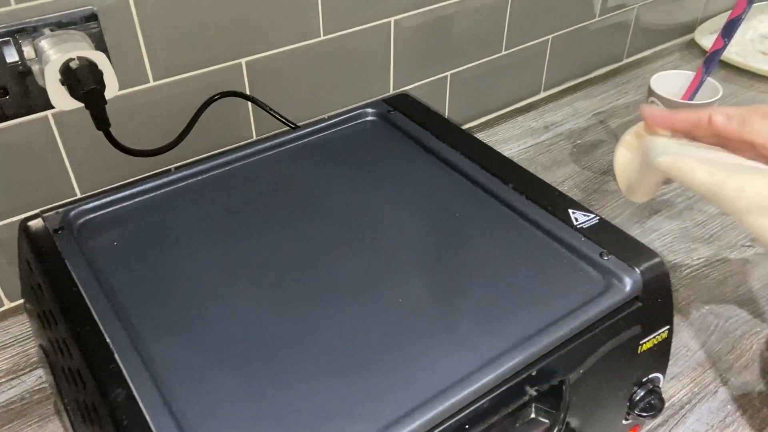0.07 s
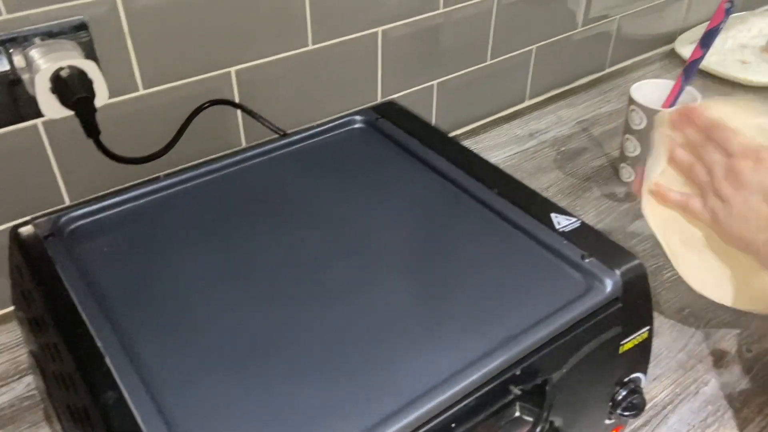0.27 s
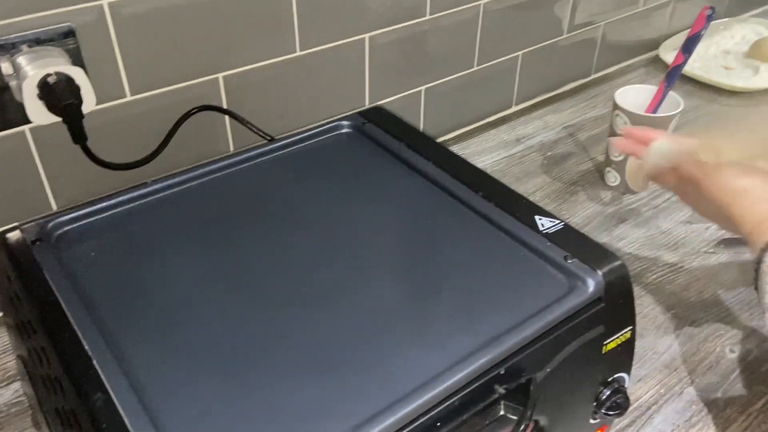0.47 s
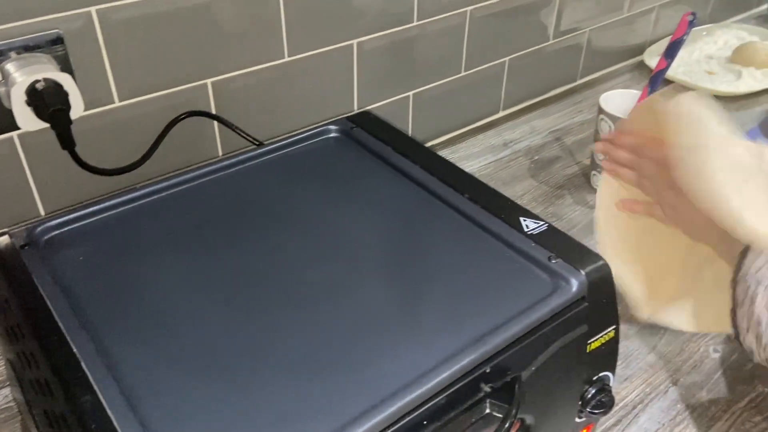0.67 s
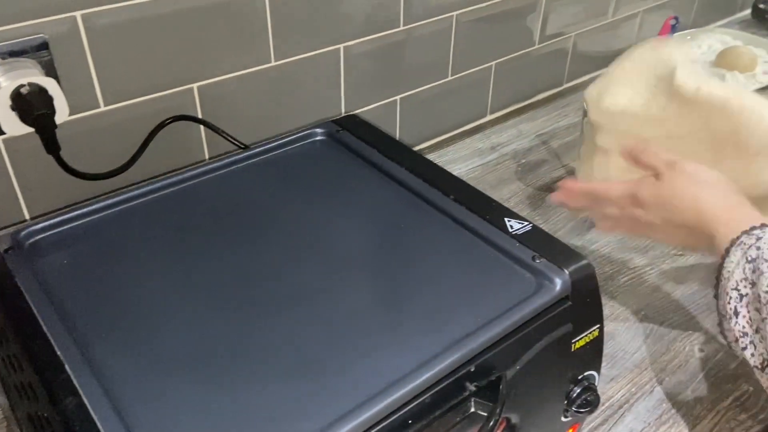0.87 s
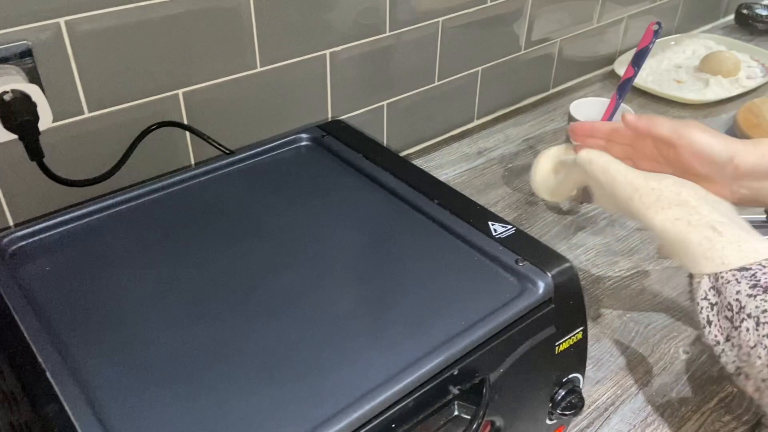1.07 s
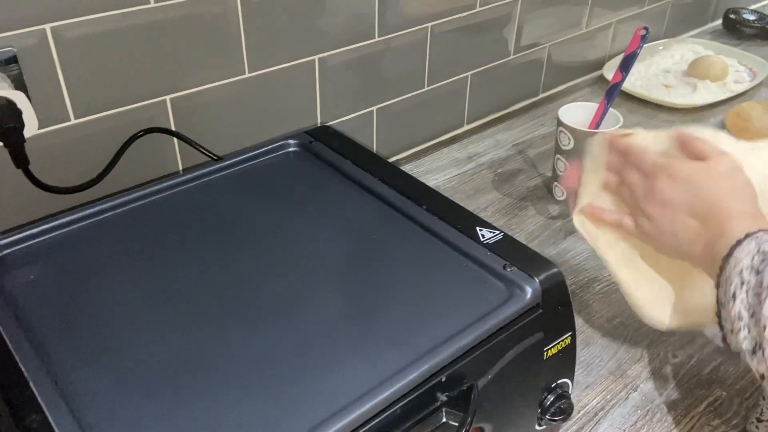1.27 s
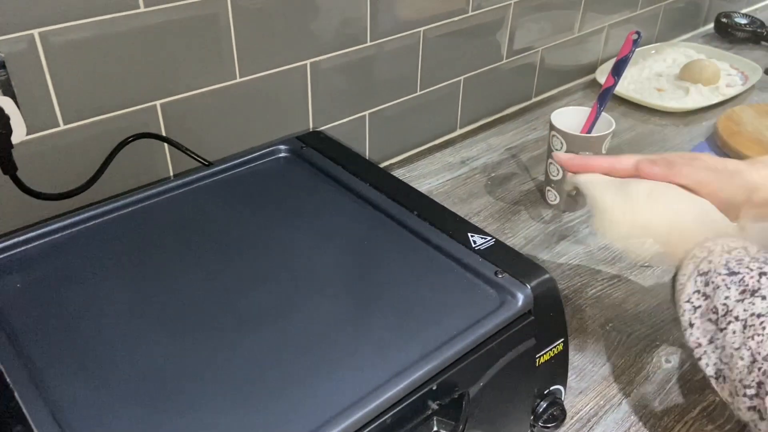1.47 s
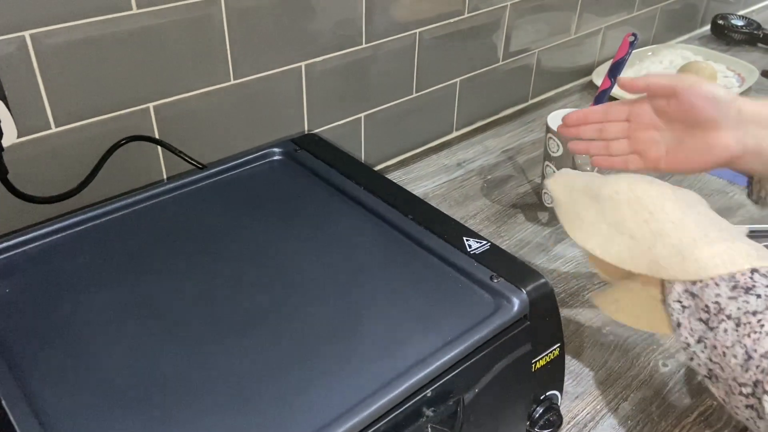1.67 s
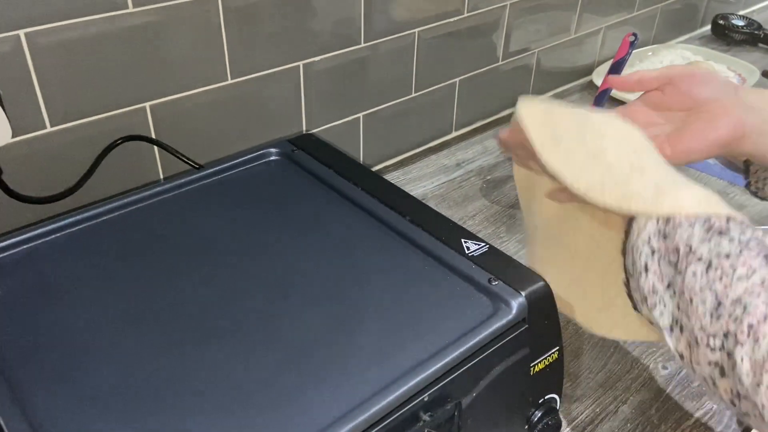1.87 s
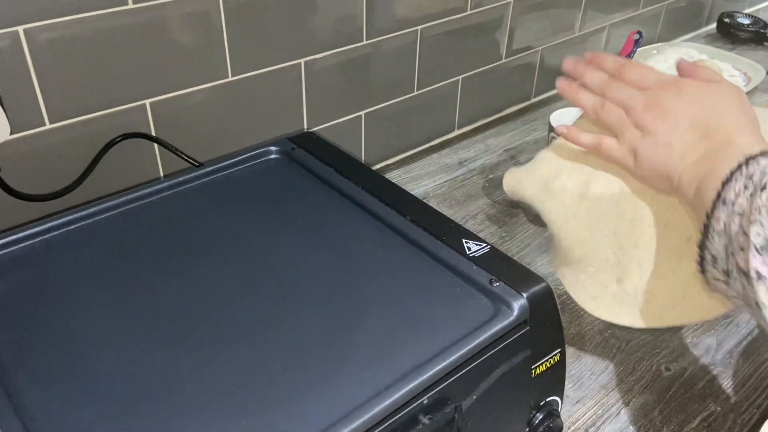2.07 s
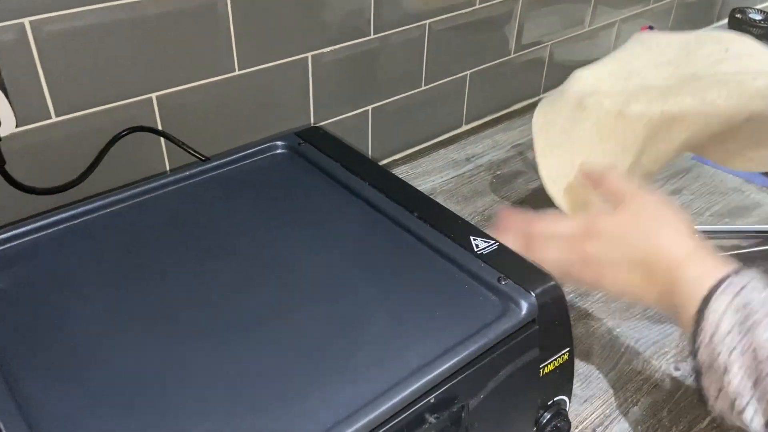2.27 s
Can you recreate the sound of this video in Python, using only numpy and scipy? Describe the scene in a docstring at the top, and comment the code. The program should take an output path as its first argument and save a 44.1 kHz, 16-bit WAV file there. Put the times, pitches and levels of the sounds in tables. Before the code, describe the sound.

Close phone pickup of dough slapped between palms: fleshy cracks with hollow air pops and soft low thuds, light brushing between them, a pause, then a final quieter slap, with short kitchen reverberation and faint appliance hum.

```python
"""A round of flatbread dough is tossed from hand to hand in a tiled kitchen, over a faint appliance hum.
It opens in the middle of a slap; about four slaps a second follow, then a gap of light brushes, then a last slap.
Each slap is a crack of skin on dough (shaped noise), a pop of trapped air (narrow noise), and the knocks
of the palm's hollow and the dough's weight (fading sine waves). Fingers and dough edge brush in between.
Cracks and brushes get a quick tile echo, thuds set off low room resonances, all leave a tail of fading noise."""
import sys
import numpy as np
from scipy import signal
from scipy.fft import rfft, irfft
from scipy.io import wavfile
from scipy.ndimage import uniform_filter1d

SR = 44100
rng = np.random.default_rng(int(sys.argv[2]) if len(sys.argv) > 2 else 0)


def wav_record(signal):
    """Record a signal, one row per channel, as 16-bit PCM in the file named by sys.argv[1]."""
    frames = np.transpose(np.atleast_2d(signal))
    bounded = np.clip(frames, -1, 1)
    # unit amplitude maps onto the largest positive 16-bit level
    quanta = np.round(bounded * 32767).astype(np.int16)
    wavfile.write(sys.argv[1], SR, quanta)


N = 101429
LEAD_S = 0.1  # extra time before the start, so that the first slap can begin early


def undb(db):
    """Turn decibels into a plain multiplier."""
    return 10 ** (np.asarray(db) / 20)


def unit(x):
    """Scale to rms 1."""
    return x / np.sqrt(np.mean(x ** 2))


def curve(points, hz):
    """Read a table between its rows, on a log-frequency axis."""
    p = np.array(points, float)
    return np.interp(np.log(np.maximum(hz, 1)), np.log(p[:, 0]), p[:, 1])


def freqs(size):
    """Frequencies in Hz of the spectrum of a sound with this many samples."""
    return np.arange(size // 2 + 1) * SR / size


def noise(gain):
    """Noise of rms 1 with the given gain at each frequency: every frequency gets a random phase."""
    phase = 2 * np.pi * rng.random(len(gain))
    return unit(irfft(gain * np.exp(1j * phase)))


def resonance(f, hz, width_hz):
    """Gain of a resonance, down to half at width_hz from its centre."""
    return 1 / (1 + ((f - hz) / width_hz) ** 2)


def add(out, x, start_s):
    """Mix a sound in at its time."""
    i = max(int((start_s + LEAD_S) * SR), 0)
    n = min(x.shape[-1], out.shape[-1] - i)
    out[..., i:i + n] += x[..., :n]


def stereo(mid, side):
    """Left and right from what they share (mid) and how they differ (side)."""
    return np.array([mid + side, mid - side])


def burst(gain, rise_s, hold_s, release_s):
    """A short rush of evenly coloured noise: rise, hold, release."""
    x = noise(gain)
    t = np.arange(len(x)) / SR
    rise = np.minimum(t / rise_s, 1)
    release = np.exp(-np.maximum(t - rise_s - hold_s, 0) / release_s)
    env = rise * release
    # keep the phases but restore the wanted colour: this fills the chance holes in the spectrum
    phase = np.angle(rfft(x * env))
    even = irfft(gain * np.exp(1j * phase))
    return unit(even * np.sqrt(env)) * np.sqrt(np.mean(env ** 2))


def knock(t, hz, rise_s, decay_s):
    """A softly struck, heavily damped mode: a sine wave that swells briefly and dies."""
    env = (1 - np.exp(-t / rise_s)) * np.exp(-t / decay_s)
    return np.sqrt(2) * env / env.max() * np.sin(2 * np.pi * hz * t)


# Colour of skin meeting dough. Each row: frequency in Hz, relative level per Hz in dB.
SKIN_COLOUR = [(40, -26.5), (120, -9.5), (220, -0.5), (290, -10), (450, 3), (560, -5.5), (720, -3.5),
               (1000, -8.5), (1400, 0.5), (2000, -1), (2900, -5.5), (4100, -5.5), (5200, -14.5),
               (7500, -16.5), (9500, -23.5), (12500, -15.5), (15500, -26.5)]
TILT_LOW_HZ, TILT_TOP_HZ = 200, 7000  # the tilt stops growing outside this range


def skin(f, tilt_db):
    """Spectrum of the contact, brighter for a flatter blow; tilt in dB per octave around 1500 Hz."""
    octaves = np.log2(np.clip(f, TILT_LOW_HZ, TILT_TOP_HZ) / 1500)
    return undb(curve(SKIN_COLOUR, f) + tilt_db * octaves)


CONTACT_S, RELEASE_S = 0.0033, 0.0048  # hold and release of the crack


def crack(f, tilt_db, rise_s):
    """Wet skin hits dough: a burst of broad noise."""
    return burst(skin(f, tilt_db), rise_s, CONTACT_S, RELEASE_S)


SQUEEZE_HZ, SQUEEZE_WIDTH_HZ, SQUEEZE_RELEASE_S = 930, 260, 0.006


def squeezed_air(f, rise_s):
    """Air pressed out between hand and dough: a burst of noise around one pitch."""
    return burst(resonance(f, SQUEEZE_HZ, SQUEEZE_WIDTH_HZ), rise_s, CONTACT_S, SQUEEZE_RELEASE_S)


POCKET_HOLD_S, POCKET_RELEASE_S = 0.0026, 0.0025


def pop(f, hz, width_hz, rise_s):
    """Air trapped under the palm resonates: a burst of noise in a band around the pocket's pitch."""
    return burst(resonance(f, hz, width_hz), rise_s, POCKET_HOLD_S, POCKET_RELEASE_S)


# Hollow of the palm. Each row: frequency in Hz before a small random change,
# level in dB added to the slap's palm level, decay in seconds.
PALM_MODES = [(363, -1, 0.0063), (436, -10, 0.004)]
PALM_SCATTER, PALM_RISE_S = 0.02, 0.0025  # scatter: typical random change of pitch, as a share


def palm(t):
    """The palm's hollow rings for a moment, in a few damped modes."""
    # the pitch varies a little with each direction the ring is sent, which blurs it in the room
    pitch_change = np.exp(PALM_SCATTER * rng.standard_normal())
    return sum(undb(db) * knock(t, hz * pitch_change, PALM_RISE_S, decay_s) for hz, db, decay_s in PALM_MODES)


THUD_HZ, THUD_RISE_S, THUD_DECAY_S = 160, 0.0018, 0.0038


def thud(t):
    """The dough's weight lands: a soft low knock."""
    return knock(t, THUD_HZ, THUD_RISE_S, THUD_DECAY_S)


SAG_HZ, SAG_RISE_S, SAG_DECAY_S = 102, 0.0022, 0.011


def sag(t):
    """The dough sags after landing: a lower, longer knock."""
    return knock(t, SAG_HZ, SAG_RISE_S, SAG_DECAY_S)


RUSTLE_GRAIN_S, RUSTLE_SPREAD_DB = 0.0015, 5


def rustle(x):
    """Dough sticks and peels in tiny patches, so a touch comes in uneven grains."""
    grain = int(RUSTLE_GRAIN_S * SR)
    levels = undb(RUSTLE_SPREAD_DB * rng.standard_normal(len(x) // grain + 1))
    patches = uniform_filter1d(np.repeat(levels, grain), grain // 2)  # soften the steps
    return unit(x * patches[:len(x)]) * np.std(x)


TOUCH_RISE_SHARE, TOUCH_HOLD_SHARE, TOUCH_RELEASE_SHARE = 0.35, 0.69, 0.18  # of the touch's length


def touch(f, length_s, tilt_db):
    """Fingers or dough edge brush lightly: a grainy burst in the colour of skin on dough."""
    brush = burst(skin(f, tilt_db), length_s * TOUCH_RISE_SHARE,
                  length_s * TOUCH_HOLD_SHARE, length_s * TOUCH_RELEASE_SHARE)
    return rustle(brush)


# The slaps. Each row: start in seconds, crack level in dB, crack tilt in dB per octave,
# air pocket pitch in Hz, pocket width in Hz, pop level in dB, pocket overtone level in dB,
# squeezed air level in dB, palm level in dB, thud level in dB, sag level in dB, rise in seconds.
SLAPS = [(-.045, -17.5, 0.5, 1340, 300, -21, -41, -47, -22.5, -29.5, -38.5, 0.0015),
         (0.223, -23, -0.4, 1264, 190, -18.5, -26, -41, -24.5, -37.5, -34, .00064),
         (0.4278, -11.5, 0, 1650, 450, -10, -19.5, -27.5, -15, -22.5, -32.5, 0.0026),
         (0.689, -27, 0.1, 1950, 500, -28, -38.5, -51.5, -36.5, -36, -39.5, 0.00035),
         (.9010, -20, 0.84, 1303, 171, -14, -24, -22.5, -26.5, -32.5, -37, 0.0042),
         (1.1877, -28.5, -0.2, 1367, 380, -22, -55, -32.5, -37.5, -35, -36.5, 0.002505),
         (1.42, -30.5, -0.7, 1556, 380, -22.5, -43, -32, -28, -30, -36.5, 0.0058),
         (2.0050, -25.5, -0.5, 1540, 200, -31, -30.5, -52, -26, -36, -33.5, 0.0041)]
# Light touches of fingers and dough edge. Each row: start in seconds, length in seconds,
# level in dB, tilt in dB per octave.
TOUCHES = [(0.197, 0.017, -30, 0), (0.296, 0.021, -48, 6.5), (0.417, 0.0068, -37, -1.5),
           (0.658, 0.012, -47, -0.5), (0.672, 0.018, -34.5, -1.9), (0.759, 0.023, -49.5, 4),
           (0.8918, 0.021, -28.5, -3.5), (1.156, 0.011, -38.5, -1.5), (1.163, 0.039, -41, -1),
           (1.279, 0.023, -49.5, 7), (1.412, 0.015, -40.5, 2), (1.47, 0.014, -43, -1.5),
           (1.561, 0.011, -47, -13), (1.631, .1, -70, 4), (1.964, 0.0039, -55, -5),
           (1.9927, 0.011, -41, -4)]
OVERTONE_RATIO = 1.87  # pitch of the pocket's overtone over its main pitch
SAG_DELAY_S = 0.016


def hands(size=8192):
    """Skin contact, air-pocket pops, palm hollow and low thuds as they radiate in one direction."""
    f, t = freqs(size), np.arange(size) / SR
    contact, pops, palms, thuds = np.zeros((4, N + int(LEAD_S * SR)))
    for (start_s, crack_db, tilt_db, pocket_hz, width_hz, pop_db, overtone_db,
         squeeze_db, palm_db, thud_db, sag_db, rise_s) in SLAPS:
        landed_s = start_s + rise_s
        add(contact, undb(crack_db) * crack(f, tilt_db, rise_s), start_s)
        add(contact, undb(squeeze_db) * squeezed_air(f, rise_s), landed_s)
        add(pops, undb(pop_db) * pop(f, pocket_hz, width_hz, rise_s), start_s)
        add(pops, undb(overtone_db) * pop(f, pocket_hz * OVERTONE_RATIO, width_hz, rise_s), start_s)
        add(palms, undb(palm_db) * palm(t), landed_s)
        add(thuds, undb(thud_db) * thud(t), landed_s)
        add(thuds, undb(sag_db) * sag(t), start_s + SAG_DELAY_S)
    for start_s, length_s, db, tilt_db in TOUCHES:
        add(contact, undb(db) * touch(f, length_s, tilt_db), start_s)
    return contact, pops, palms, thuds


WALL_DELAY_S, WALL_DB = 0.0032, -5.5


def wall(x):
    """The tiles just behind the hands return a quick echo that ripples the crack's colour."""
    echo = np.pad(x, (int(WALL_DELAY_S * SR), 0))[:len(x)]
    return (x + undb(WALL_DB) * echo) / np.hypot(1, undb(WALL_DB))


# Phase by which the left ear leads. Each row: frequency in Hz, lead in radians.
EAR_PHASE = [(100, 0), (300, 0.6), (440, 0.54), (600, 1.7), (1050, 1.2), (1400, 1.65), (2300, 1.41),
             (3000, 0.97), (6000, 1.1), (7500, 0.5), (9000, -13.5), (11000, -3), (13500, -16), (15500, -11)]
LEFT_DB = 0.54  # how much louder the left ear is than the right


def counter(x, size=131072):
    """The direct sound, scattered by worktop and tiles, reaches the two ears a little out of step."""
    lead = curve(EAR_PHASE, freqs(size))
    ears = np.array([[1], [-1]]) / 2  # each ear takes half of the difference
    shifted = irfft(rfft(x, size) * np.exp(1j * ears * lead))
    return shifted[:, :len(x)] * undb(ears * LEFT_DB)


# Low room resonances set off by the thuds. Each row: frequency in Hz,
# time to fade by 60 dB in seconds, level in dB.
ROOM_MODES = [(66.4, 0.27, -16), (114, 0.96, -3), (250, .3, -9)]


def boom(thuds, size=32768):
    """The room's low resonances ring on after each thud."""
    t = np.arange(size) / SR
    ring = 0
    for hz, t60, db in ROOM_MODES:
        fade = np.exp(-np.log(1000) * t / t60)
        ring = ring + undb(db) * unit(np.sin(2 * np.pi * hz * t) * fade)
    return signal.fftconvolve(thuds, ring * 2 / size)[:len(thuds)]


POP_ROOM_DB = -3.5  # the pocket faces the listener, so less of it reaches the room
PALM_ROOM_DB, THUD_ROOM_DB = -4, -3.5


def outward(contact, pops, palms, thuds):
    """The share of each sound that spreads into the room."""
    return contact + undb(POP_ROOM_DB) * pops + undb(PALM_ROOM_DB) * palms + undb(THUD_ROOM_DB) * thuds


# Colour of the kitchen's tail. Each row: frequency in Hz, level in dB.
ROOM_COLOUR = [(50, -13.5), (110, 6.5), (170, -3.5), (260, -1.5), (350, -7), (450, -0.5), (600, -2),
               (850, -5), (1400, -9.5), (3500, -8), (7000, -8.5), (15000, -13.5)]
# How long the tail lasts. Each row: frequency in Hz, time to fade by 60 dB in seconds.
ROOM_T60 = [(60, 0.2), (400, 0.48), (1200, 0.46), (3500, 0.55), (8000, 0.5), (15000, .65)]
# Stereo width of the tail and of the room air. Each row: frequency in Hz, side level against mid in dB.
ROOM_WIDTH = [(100, -16.5), (350, -8), (700, -0.5), (1400, -0.5), (4000, -7), (11000, 1)]
ROOM_DELAY_S, ROOM_BUILD_S = 0.003, 0.0015
EARLY_DB, EARLY_S = -8.5, 0.046  # extra strength at the start of the tail, and its decay


def kitchen(x, size=32768):
    """Many overlapping reflections, as fading noise whose fade time depends on pitch."""
    f, t = freqs(size), np.arange(size) / SR
    late = np.maximum(t - ROOM_DELAY_S, 0)
    build = 1 - np.exp(-late / ROOM_BUILD_S)
    shape = build * (1 + undb(EARLY_DB) * np.exp(-late / EARLY_S))
    mid, side = (rfft(noise(np.ones(len(f)))) for _ in range(2))
    both = stereo(mid, side * undb(curve(ROOM_WIDTH, f))) * undb(curve(ROOM_COLOUR, f))
    response, octave = 0, np.log2(np.maximum(f, 1))
    for k in range(5, 16, 2):  # overlapping bands centred on 2**k Hz
        band = np.maximum(1 - np.abs(octave - k) / 2, 0)
        env = shape * np.exp(-np.log(1000) * t / curve(ROOM_T60, 2. ** k))
        response = response + irfft(both * band) * env / np.sqrt(np.sum(env ** 2))
    return signal.fftconvolve(x[None], response, axes=1)[:, :len(x)]


# Colour of the still room air. Each row: frequency in Hz, relative level per Hz in dB.
AIR_COLOUR = [(25, -17.5), (55, 0.5), (100, -2.5), (170, -14), (240, -6), (300, -9.5), (420, -13.5),
              (600, -21), (1000, -25), (2000, -38.5), (5000, -45.5), (15000, -46)]
AIR_DB = -58.5
# Unsteady hum. Each row: frequency in Hz, width in Hz, level in dB.
HUM = [(51.6, 9, -59), (242.5, 18, -65), (408, 25, -61)]
# Steady appliance tones. Each row: frequency in Hz, level in dB.
TONES = [(50, -59), (420, -65), (1500, -77)]


def background(size=131072):
    """Still room air as soft noise, and an appliance's hum (narrow noise) and faint whine (sines)."""
    f, t = freqs(size), np.arange(size) / SR
    gain = undb(curve(AIR_COLOUR, f))
    side_gain = gain * undb(curve(ROOM_WIDTH, f))
    side_level = np.linalg.norm(side_gain) / np.linalg.norm(gain)
    air = stereo(noise(gain), noise(side_gain) * side_level)
    hum = sum(undb(db) * noise(resonance(f, hz, width_hz)) for hz, width_hz, db in HUM)
    whine = sum(undb(db) * np.sqrt(2) * np.sin(2 * np.pi * hz * t) for hz, db in TONES)
    return (undb(AIR_DB) * air + hum + whine)[:, :N]


def scene(count=4):
    """The hands close by; the room gathers what they radiate in several other directions."""
    contact, pops, palms, thuds = hands()
    direct = counter(wall(contact) + pops + palms + thuds)
    # each direction has its own random grain
    room = sum(kitchen(outward(*hands())) for _ in range(count)) / np.sqrt(count)
    return (direct + boom(thuds) + room)[:, -N:] + background()


LOW_CUT_HZ, TOP_HZ = 33, 15800


def record(dry):
    """The phone drops the rumble, rounds the highest peaks and cuts the top."""
    x = signal.sosfilt(signal.butter(3, LOW_CUT_HZ, "high", fs=SR, output="sos"), dry)
    soft = x / (1 + x ** 4) ** .25
    return signal.sosfilt(signal.ellip(8, .2, 70, TOP_HZ, fs=SR, output="sos"), soft)


dry = scene()
out = record(dry)
wav_record(out)
```